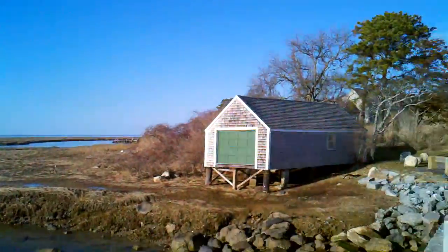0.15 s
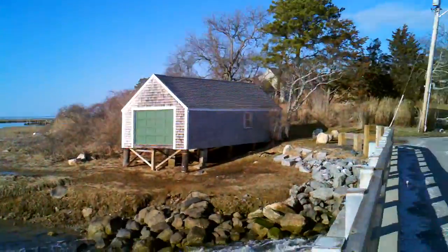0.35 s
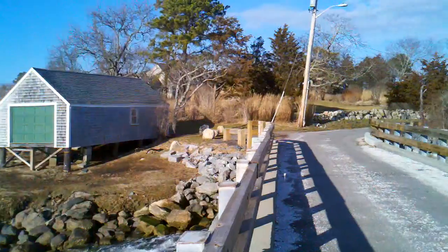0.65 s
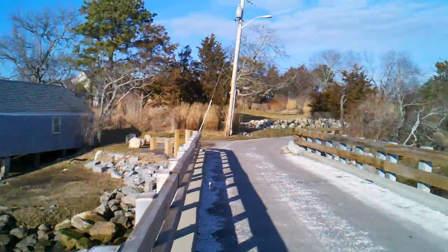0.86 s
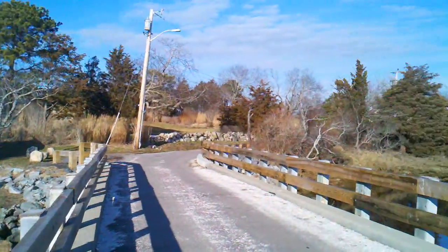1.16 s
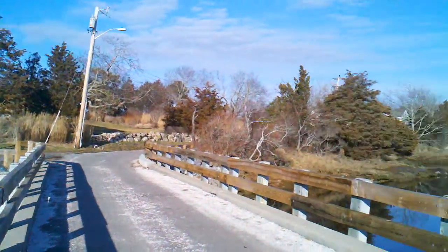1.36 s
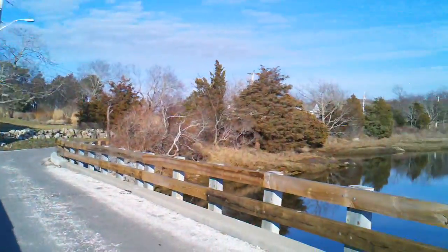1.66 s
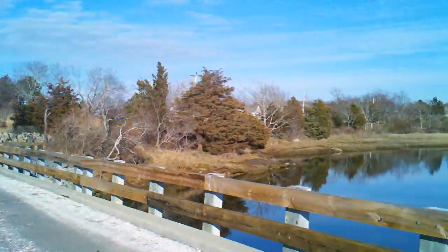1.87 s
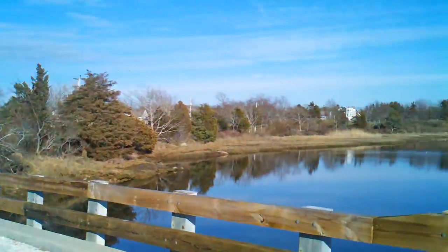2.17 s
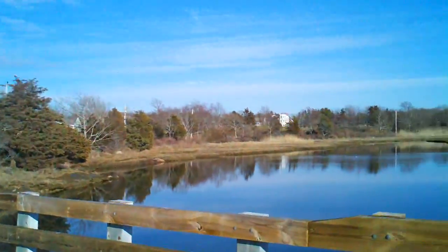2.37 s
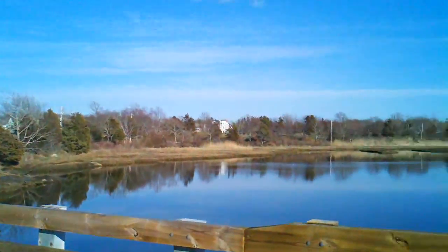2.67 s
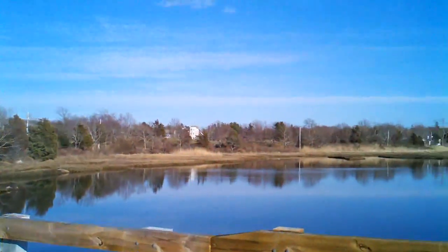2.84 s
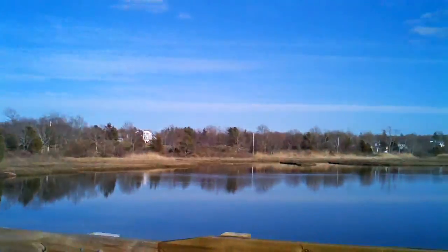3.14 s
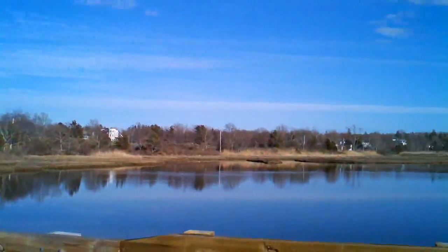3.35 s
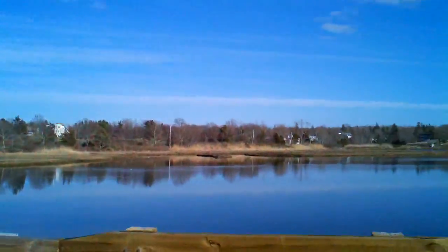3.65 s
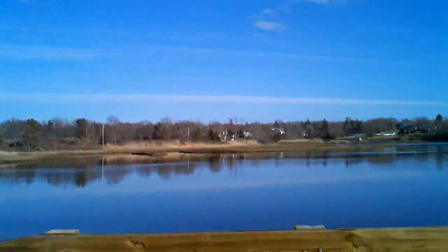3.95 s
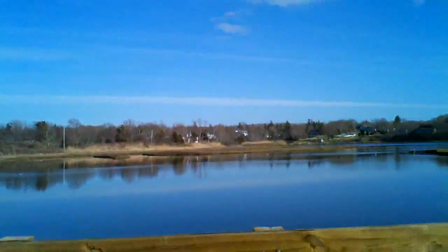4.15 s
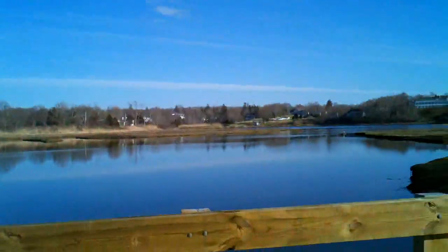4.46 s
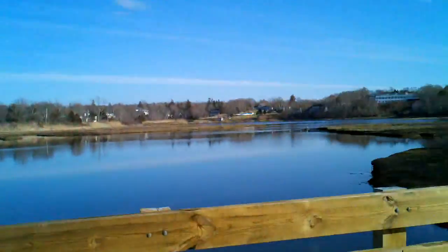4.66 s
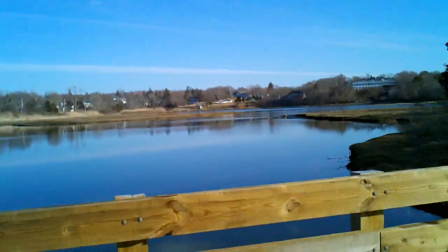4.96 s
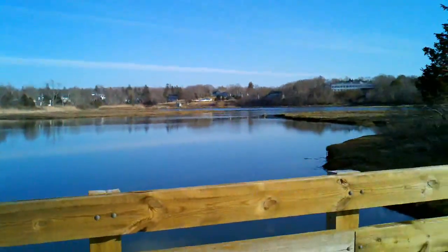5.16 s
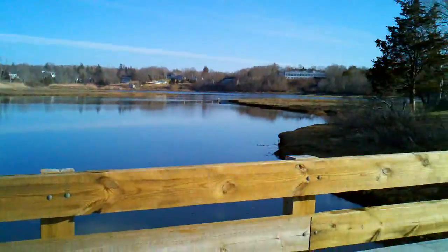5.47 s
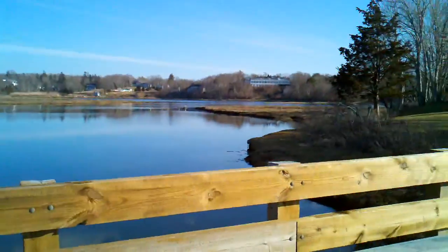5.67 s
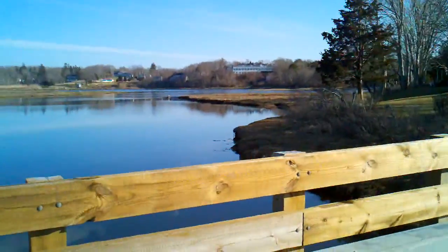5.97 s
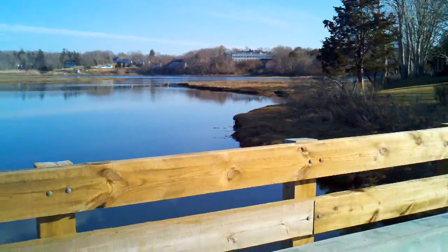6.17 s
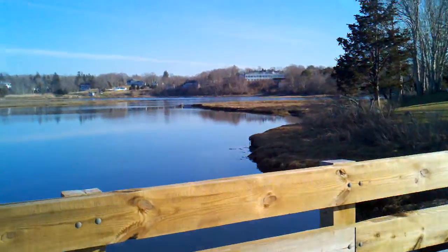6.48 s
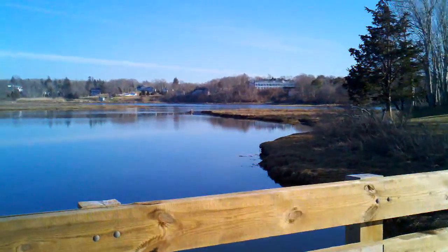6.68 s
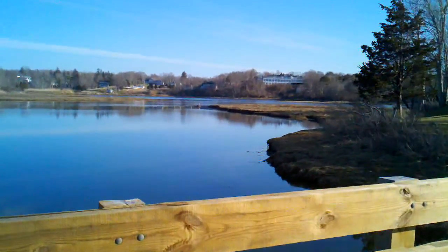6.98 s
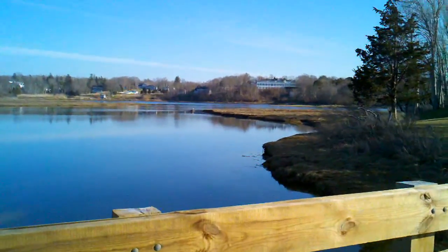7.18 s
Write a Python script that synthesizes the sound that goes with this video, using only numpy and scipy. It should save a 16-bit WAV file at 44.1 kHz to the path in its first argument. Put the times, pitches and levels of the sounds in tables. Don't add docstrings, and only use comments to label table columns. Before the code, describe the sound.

Fast water churns and rushes steadily through a rocky channel under a low bridge, with finger knocks and rubs on the recorder's case.

```python
import sys
import numpy as np
from scipy import signal
from scipy.fft import rfft, irfft, next_fast_len
from scipy.io import wavfile
from scipy.ndimage import map_coordinates

SR = 44100
rng = np.random.default_rng(int(sys.argv[2]) if len(sys.argv) > 2 else 0)


def generate_wav(signal):
    frames = np.transpose(np.atleast_2d(signal))
    scaled = np.clip(frames, -1, 1) * 32767
    pcm = np.round(scaled).astype(np.int16)
    wavfile.write(sys.argv[1], SR, pcm)


def volts_from_decibels(level):
    exponent = np.asarray(level, float) / 20
    return 10 ** exponent


N = 322812


def at_hz(points, hz):
    table_hz, value = np.transpose(points)
    return np.interp(np.log(hz), np.log(table_hz), value)


def in_time(rows):
    s, *columns = np.transpose(rows)
    return np.array([np.interp(np.arange(N) / SR, s, c) for c in columns])


def rms_one(x):
    return x / np.sqrt(np.mean(x ** 2) + 1e-20)


def drift(rate_hz):
    step = 40
    r = np.exp(-2 * np.pi * rate_hz * step / SR)
    noise = rng.standard_normal(N // step + 2002)
    slow = signal.lfilter([1], [1, -2 * r, r * r], noise)[2000:]
    return np.interp(np.arange(N) / step, np.arange(len(slow)), rms_one(slow))


def resonance(x, hz, width_hz):
    r = np.exp(-np.pi * width_hz / SR)
    zeros = np.array([1, 0, -1]) * (1 - r * r) / 2
    poles = [1, -2 * r * np.cos(2 * np.pi * hz / SR), r * r]
    return signal.lfilter(zeros, poles, x)


def add(track, s, sound):
    i = int(s * SR)
    track[i:i + len(sound)] += sound[:N - i]


def later(x, lag):
    return map_coordinates(x, [np.arange(N) - lag], order=3, mode="nearest")


def random_impulses(rate_hz, spread_db):
    sizes = volts_from_decibels(spread_db * np.minimum(rng.exponential(1, (2, N)), 5))
    happens = rng.random((2, N)) < rate_hz / SR
    return sizes * happens * rng.choice([-1, 1], (2, N))


# start_s, roar_lag_samples (under the bridge), splash_lag_samples (on the rocks)
DIRECTION = [(0, 2.9, 9.2), (.7, 10.7, 15.2), (1.25, 12.6, 18.9), (1.75, 13.2, 18), (2.25, 13.7, 15.8),
             (2.75, 13.6, 13.4), (3.5, 12, 11.7), (4.25, 10.4, 9.8), (5.2, 7.8, 8.1), (6.2, 3.5, 7.5),
             (7.32, 6.4, 6.6)]
# freq_hz, level_db_per_hz
WATER_SPECTRUM = [(80, -23.5), (110, -10), (160, -4), (250, 1), (400, 0), (600, -1), (900, -6),
                  (1500, -10.5), (2100, -12), (3200, -17), (5000, -22), (8000, -13.5), (11000, -21),
                  (14000, -23)]
# freq_hz, share_0_1
AIMED_SHARE = [(70, 0.87), (150, 1), (400, 0.96), (750, 0.79), (1200, 0.82), (1900, 0.49), (3300, 0.67),
               (5000, 0.06), (8000, 0)]
# start_s, level_db, spray_shadow_db
FACING = [(0, 2.5, -1), (.45, 1, 0), (.95, 1, 1), (1.45, 0.5, 0.5), (1.95, 1, -0.5), (2.5, 0.5, -.5),
          (2.9, .5, -.5), (3.5, 1, -1), (4.1, 0.5, -2), (4.7, -0.5, -5), (5.2, -0.5, -6.5), (5.75, -1, -7),
          (6.1, -2, -10), (6.55, -3.5, -6), (6.95, -6, -4.5), (7.32, -6, -5)]
# freq_hz, share
SHADOW_SHARE = [(420, 0.01), (700, 0.21), (1900, 0.25), (2700, 0.37), (3600, 1), (5500, 0.78), (12000, 1.2)]
# freq_hz, change_db
PARAPET_COLOUR = [(300, 0.5), (450, 3.1), (700, -2), (1200, -3.5), (2000, -4.5), (2900, -2), (3600, 1.5),
                  (5000, -.5)]


def water(bubble_share, surge_db, flicker_db):
    level_db, shadow_db = in_time(FACING)
    hidden = in_time([(0.47, -.5), (2.34, .5)])[0]
    white = rng.standard_normal((2, 3, N))
    bursts = rms_one(random_impulses(rate_hz=1500, spread_db=3.15))
    white[:, 0] = np.sqrt(1 - bubble_share) * white[:, 0] + np.sqrt(bubble_share) * bursts
    surge = drift(9.5)
    edges_hz = 60 * 2 ** np.arange(0, 8.1, 1 / 3)
    total, splash = np.zeros((3, N)), np.zeros(N)
    for k, (low_hz, high_hz) in enumerate(zip(edges_hz, edges_hz[1:])):
        hz = np.sqrt(low_hz * high_hz)
        turn_db = level_db + at_hz(SHADOW_SHARE, hz) * shadow_db + at_hz(PARAPET_COLOUR, hz) * hidden
        lively = at_hz([(500, .3), (4000, 1)], hz)
        motion_db = lively * (surge_db * surge + flicker_db * drift(17.0))
        share = np.clip(at_hz(AIMED_SHARE, hz), 0, 1)
        third_octave = signal.butter(2, [low_hz, high_hz], "band", fs=SR, output="sos")
        bands = signal.sosfilt(third_octave, white[k % 2])
        bands *= volts_from_decibels(at_hz(WATER_SPECTRUM, hz) + turn_db + motion_db)
        bands *= np.sqrt([[share], [1 - share], [1 - share]])
        total += bands
        if hz > 1000:
            splash += bands[0]
    aimed, first, second = total
    roar_lag, splash_lag = in_time(DIRECTION)
    second_port = later(aimed - splash, roar_lag) + later(splash, splash_lag) + second
    return volts_from_decibels(-25) * rms_one(np.array([aimed + first, second_port]))


def rumble():
    low = signal.butter(2, [22, 75], "band", fs=SR, output="sos")
    return volts_from_decibels(-61) * rms_one(signal.sosfilt(low, rng.standard_normal((2, N))))


# start_s, peak_db, ring_hz, sharp_db
FINGER_TICKS = [(1.2335, -7, 1640, -45), (1.3373, -13, 1950, -44), (1.545, -26, 2230, -31),
                (2.372, -1.5, 1500, -29), (2.659, -15, 1650, -44), (4.8282, -7, 1440, -52),
                (4.8489, -14, 1640, -50), (5.0647, -18, 1290, -49), (5.578, -20, 1600, -36),
                (5.8186, -16, 1690, -34), (5.8374, -29, 1330, -41), (5.8524, -30, 1200, -45),
                (6.437, -13, 1250, -42), (6.4434, -17, 1340, -43), (6.4916, -12, 1340, -38),
                (6.6076, -13, 1300, -35), (6.65, -16, 1510, -50), (6.8744, -13, 1500, -36),
                (7.0354, -31, 1450, -47), (7.0857, -17, 2000, -36), (7.1524, -35, 1580, -42),
                (7.1922, -19, 1330, -29.5), (7.2624, -19, 1740, -31)]
# start_s, peak_db, ring_hz, sharp_db
GRIP_SHIFT = [
    (7.2022, -18, 1750, -44),
    (7.2065, -19, 1500, -44),
    (7.2088, -18, 1450, -44),
    (7.2132, -10, 1450, -34),
    (7.2148, -16, 1400, -44),
    (7.2214, -10, 1850, -32),
    (7.2278, -20, 1500, -42),
    (7.2505, -21, 1900, -38),
]


def ticks():
    out, click = np.zeros(N), np.arange(400) == 12
    edge = resonance(resonance(click, 3400, 1400), 3400, 1400)
    snap = resonance(resonance(click, 7700, 4000), 7700, 4000)
    edge = edge / abs(edge).max()
    snap = snap / abs(snap).max()
    for start_s, peak_db, ring_hz, sharp_db in FINGER_TICKS + GRIP_SHIFT:
        body = resonance(resonance(click, ring_hz, 1200), ring_hz, 960)
        body = resonance(body, 0.76 * ring_hz, 700)
        add(out, start_s, volts_from_decibels(peak_db - 6.5) * body / abs(body).max())
        add(out, start_s, volts_from_decibels(sharp_db + 8.5) * edge + volts_from_decibels(sharp_db + 4) * snap)
    port_db = np.array([[-5.0], [-3.0]])
    return out * volts_from_decibels(port_db)


# start_s, peak_db, pitch_hz
BIG_BUBBLES = [
    (2.029, -15, 880),
    (2.27, -19, 382),
    (3.53, -29, 266),
    (5.691, -22, 755),
    (6.02, -11, 253),
]


def glugs():
    out = np.zeros(N)
    for start_s, peak_db, pitch_hz in BIG_BUBBLES:
        cycles = np.arange(int(16 * SR / pitch_hz)) * pitch_hz / SR
        shape = np.exp(-cycles / 3.15) * (1 - np.exp(-cycles / 2.0))
        ring = np.sin(2 * np.pi * (cycles + 0.0081 * cycles ** 2))
        add(out, start_s, volts_from_decibels(peak_db + 2.5) * shape * ring)
    roar_lag = in_time(DIRECTION)[0]
    return np.array([out, later(out, roar_lag)])


# start_s, length_s, level_db
SKIN_RUBS = [
    (5.728, 0.14, -38.5),
    (6.43, .03, -54),
    (6.52, .1, -79),
    (7.013, .03, -50),
    (7.035, .015, -42),
    (7.08, .02, -39.5),
    (7.197, 0.049, -38),
    (7.233, 0.059, -40.5),
]


def rubs():
    slips = random_impulses(rate_hz=2500, spread_db=4.8)
    bright = rms_one(resonance(slips, 4400, 1900) + 0.62 * resonance(slips, 6800, 6000))
    stroke = np.zeros(N)
    for start_s, length_s, level_db in SKIN_RUBS:
        phase = np.linspace(0, 1, int(length_s * SR))
        add(stroke, start_s, volts_from_decibels(level_db) * np.sin(np.pi * phase ** 0.92))
    return stroke * bright


def scene():
    churn = water(bubble_share=0.3, surge_db=0.26, flicker_db=0.9)
    return churn + rumble() + ticks() + glugs() + rubs()


def top_cut(x):
    return signal.sosfilt(signal.butter(12, 14260, fs=SR, output="sos"), x)


# ring_hz, width_hz, boost_db
PORT_CAVITY = (1845, 980, 6.18)


def record(dry):
    gap_samples, steady_hz, top_hz = 17, 4250, 14030
    ring_hz, width_hz, boost_db = PORT_CAVITY
    cavity = (volts_from_decibels(boost_db) - 1) * resonance(dry[1], ring_hz, width_hz)
    ports = np.array([dry[0], dry[1] + cavity])
    points = next_fast_len(N + 64)
    grid_hz = np.arange(points // 2 + 1) * SR / points
    steady = np.clip(.5 + (steady_hz - grid_hz) / 600, 0, 1)
    own = rfft(ports, points) * (grid_hz < top_hz)
    opposite = own[::-1] * np.exp(-2j * np.pi * grid_hz * gap_samples / SR)
    aimed = irfft((own - opposite) * steady, points)[:, :N]
    for notch in range(3, 12):
        band = np.clip(1 - abs(grid_hz * 2 * gap_samples / SR - notch), 0, 1) * (1 - steady)
        mean_share = .25 + .15 * (notch < 5) - .12 * (notch > 9)
        share = np.clip(mean_share + .42 * drift(26), 0, .95)
        near = irfft(own * band, points)[:, :N]
        far = irfft(opposite * band, points)[:, :N]
        aimed += (near - share * far) / np.sqrt(1 + share ** 2)
    return top_cut(aimed)


dry = scene()
out = record(dry)
generate_wav(out)
```